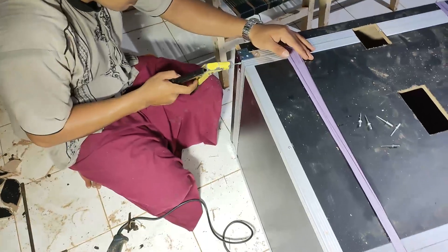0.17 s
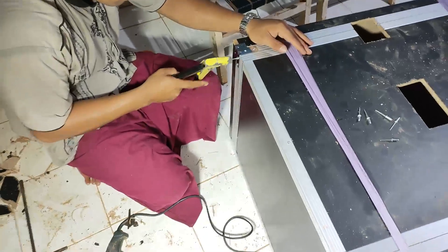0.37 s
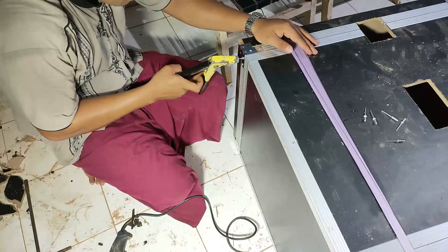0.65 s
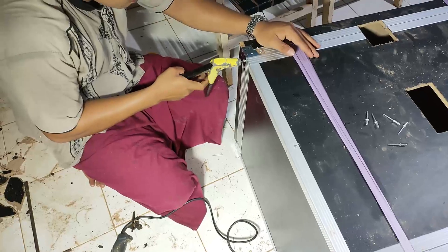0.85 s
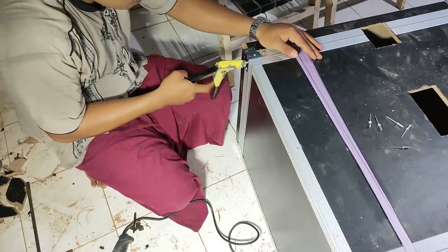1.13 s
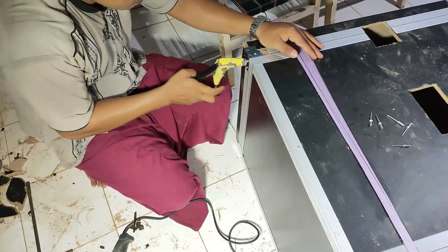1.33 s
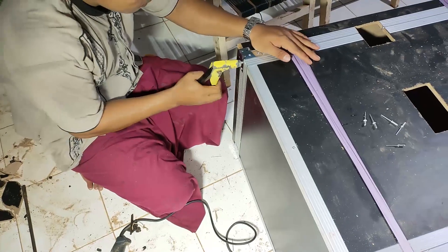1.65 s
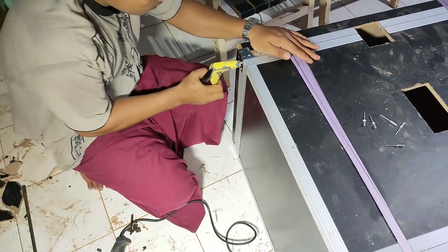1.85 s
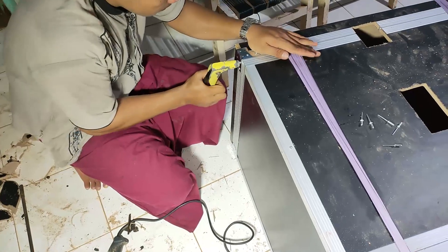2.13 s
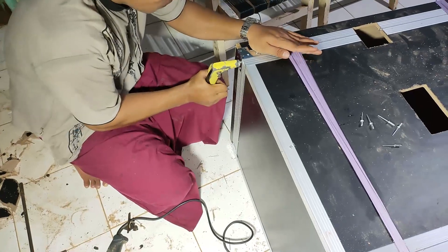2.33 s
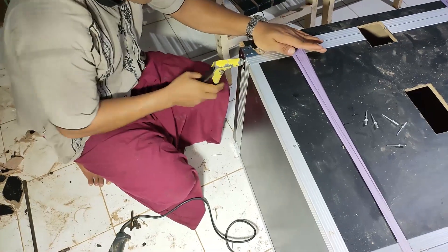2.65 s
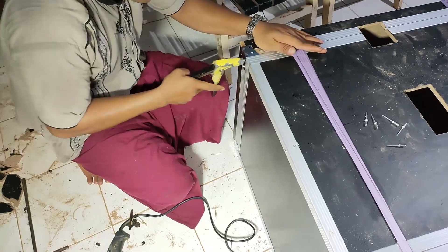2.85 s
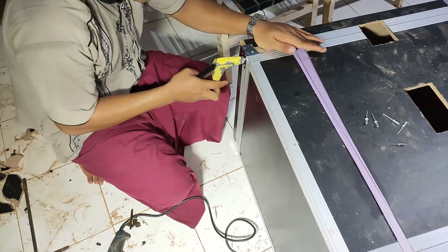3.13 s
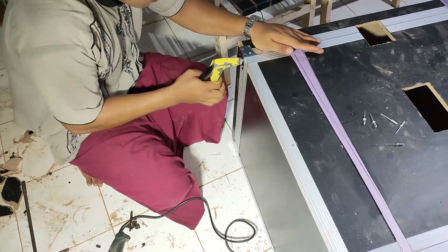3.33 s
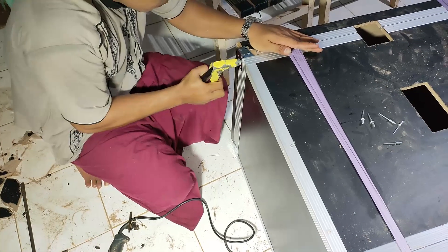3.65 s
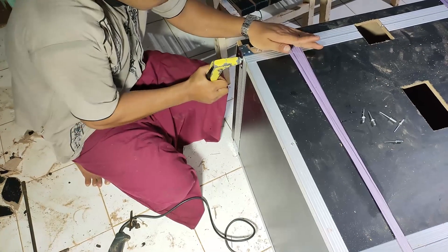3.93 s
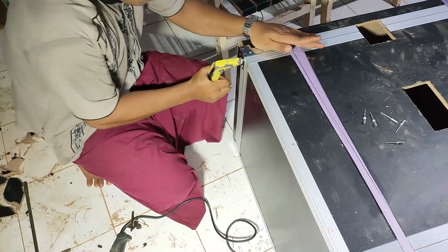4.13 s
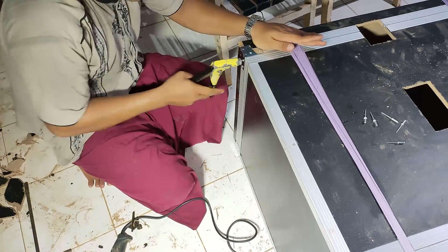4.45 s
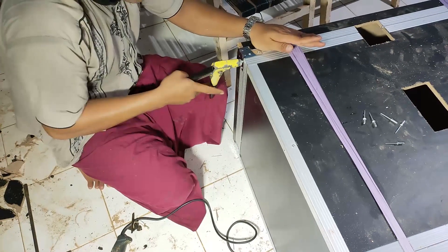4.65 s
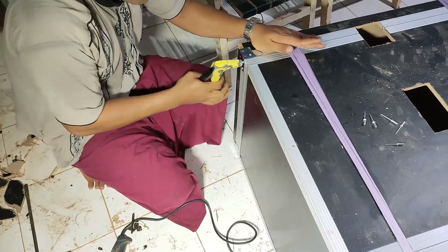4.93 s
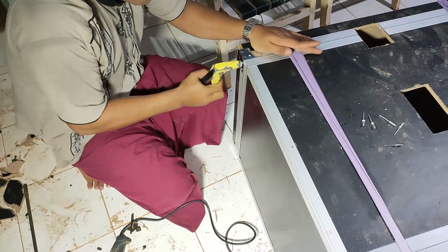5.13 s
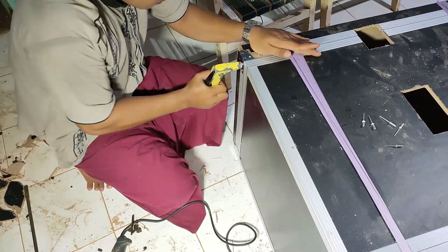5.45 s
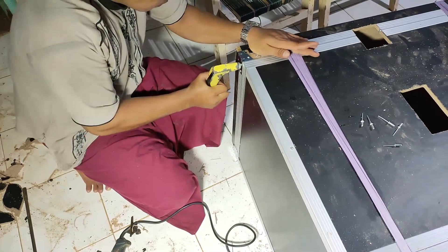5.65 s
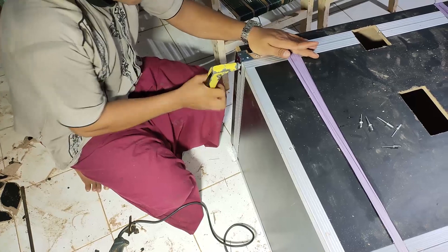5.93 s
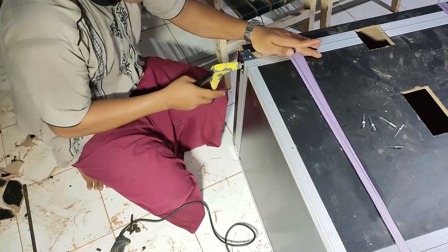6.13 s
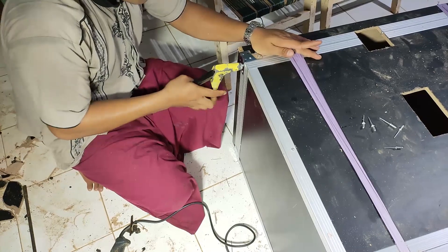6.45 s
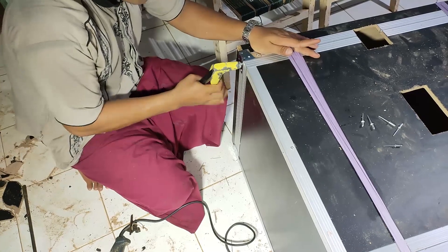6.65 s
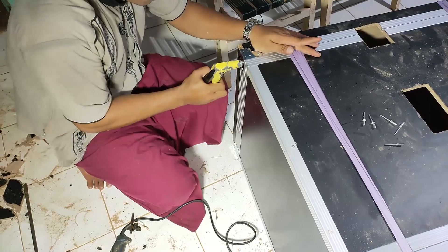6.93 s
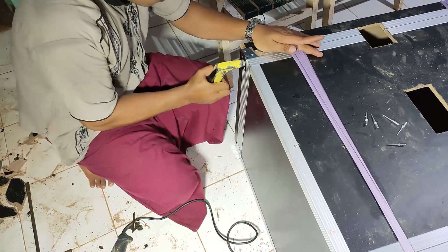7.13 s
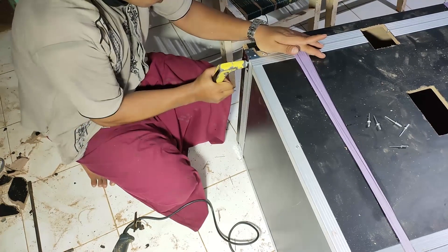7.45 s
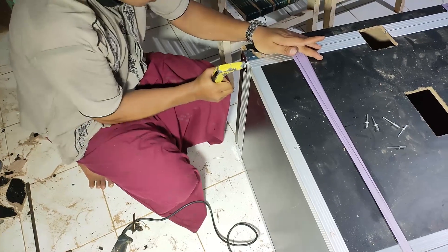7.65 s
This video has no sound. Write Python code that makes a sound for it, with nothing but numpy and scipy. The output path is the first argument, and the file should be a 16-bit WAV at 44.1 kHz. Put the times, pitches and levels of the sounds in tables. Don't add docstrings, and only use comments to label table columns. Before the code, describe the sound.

Dry, hard metal clicks of a lever tool, heard near and roughly centred, each with a short hard-walled room tail. Opening snaps give way to scattered jaw ticks, then wooden, boxy knocks against a metal profile with low creaks and brief scrapes. Two louder handle snaps leave steel ringing briefly in the later part, and the activity thins to a few small knocks. Distant insects make a thin constant hiss.

```python
import sys
import numpy as np
from scipy import signal
from scipy.io import wavfile
from scipy.ndimage import uniform_filter1d

SR = 44100
rng = np.random.default_rng(int(sys.argv[2]) if len(sys.argv) > 2 else 0)


def store_wav(level_fs):
    pcm = np.round(np.clip(np.atleast_2d(level_fs), -1, 1) * 32767)
    wavfile.write(sys.argv[1], SR, pcm.T.astype(np.int16))


def level_to_linear(level):
    exponent = np.asarray(level, float) / 20
    return 10 ** exponent


N = 343098


def evened(x):
    return x / np.sqrt(np.mean(x ** 2) + 1e-20)


def read(points, hz):
    f, value = np.transpose(points)
    return np.interp(np.log(hz + 1), np.log(f + 1), value)


def add(mix, start_s, sound):
    part = mix[round(start_s * SR):][:len(sound)]
    part += sound[:len(part)]


def ring(modes, size=16384, rise_cycles=0):
    t = np.arange(size) / SR
    out = np.zeros(size)
    for hz, db, t60_s in modes:
        build_up = 1 - np.exp(-hz * t / (rise_cycles + 1e-6))
        out += level_to_linear(db - 60 * t / t60_s) * np.sin(2 * np.pi * hz * t) * build_up
    return out


def struck(modes, luck, detune, spread_db):
    return [(hz * (1 + detune * a), db + spread_db * b, t60_s)
            for (hz, db, t60_s), a, b in zip(modes, *luck)]


def humps(start_s, length_s, db, rise_db_per_s, fall_db_per_s):
    t = np.arange(0, N + 64, 64)[:, None] / SR
    climb_db = rise_db_per_s * np.maximum(start_s - t, 0)
    sink_db = fall_db_per_s * np.maximum(t - start_s - length_s, 0)
    return np.interp(np.arange(N) / SR, t[:, 0], level_to_linear(db - climb_db - sink_db).sum(axis=1))


# (frequency [Hz], correlation [-1..1])
LIKENESS = [(60, 0.99), (180, 0.19), (550, 0.25), (1650, -0.048), (4970, 0.01), (15000, -0.031)]
# (frequency [Hz], level [dB])
LEFT_LEAN = [(60, -2), (240, 4), (950, -1.5), (3770, -5.5), (15000, -2.5)]


def hiss(colour, patchy_db, swell_db):
    frames, hz = N // 192 + 5, np.fft.rfftfreq(512, 1 / SR)
    a, b, c, d, patches = rng.standard_normal((frames, 257, 5)).T
    patches = uniform_filter1d(patches, size=5, axis=0)
    patches = evened(uniform_filter1d(patches, size=10, axis=1))
    swell = evened(uniform_filter1d(uniform_filter1d(a[0], size=40), size=40))
    same = np.clip(read(LIKENESS, hz), -1, 1)[:, None]
    left = a + 1j * b
    right = same * left + np.sqrt(1 - same ** 2) * (c + 1j * d)
    z = np.array([left, right])
    z *= level_to_linear(read(colour, hz)[:, None] + patchy_db * patches + swell_db * swell)
    z *= level_to_linear(np.multiply.outer([.5, -.5], read(LEFT_LEAN, hz)))[..., None]
    return evened(signal.istft(z, nperseg=512, noverlap=320)[1][:, :N])


# (frequency [Hz], t60 [s])
ROOM_T60 = [(100, 0.12), (260, 0.44), (700, 0.27), (1840, 0.29), (4850, 0.36), (12800, 0.2)]


def room(x):
    taps = np.zeros((2, 24000))
    at = np.arange(100, 23980, 10) + rng.integers(0, 10, (2, 2388))
    np.put_along_axis(taps, at, rng.choice([-1., 1.], at.shape), 1)
    hz, t, z = signal.stft(taps, SR, nperseg=128)
    z = z * level_to_linear(-60 * t / read(ROOM_T60, hz)[:, None])
    tail = signal.istft(z, SR, nperseg=128)[1]
    return signal.oaconvolve(x[None], tail / np.linalg.norm(tail[0]), axes=1)[:, :N]


# (frequency [Hz], density [dB per Hz])
AIR_COLOUR = [(30, 0), (55, -20.5), (300, -10.5), (467, -7), (547, -2), (860, -12), (1450, -14.5),
              (2160, -5.5), (3000, -16), (5200, -20.5), (8500, -17), (15300, -19.5), (16200, -35)]


def air():
    return level_to_linear(-55.5) * hiss(AIR_COLOUR, 2.76, 1.0)


# (frequency [Hz], density [dB per Hz])
CHORUS_COLOUR = [(3060, -32), (5200, -21), (5530, -9.5), (6450, 1), (7250, 2), (7600, -1.5), (7870, -20),
                 (8600, -68), (11200, -38), (18900, -120)]


def insects():
    return level_to_linear(-50) * hiss(CHORUS_COLOUR, 1.83, 0.53)


# (frequency [Hz], level [dB], t60 [s])
CABINET_MODES = [(53.1, -2, 0.42), (94.1, -12.5, 0.82), (128.9, 0, 0.22), (252, -40.5, 0.099),
                 (287.2, 3.5, 0.15), (376, -6.5, 0.16), (438, -2, 0.1), (510, -13, 0.14),
                 (543, -4.5, 0.092), (663, -6, 0.09)]
# (time [s], level [dB])
PUSH_WEIGHT = [(0.0, -68), (0.4, -72), (0.93, -65), (1.65, -83), (2.04, -60.5), (2.42, -58), (2.7, -60),
               (2.97, -61), (3.45, -64), (3.7, -55.5), (3.92, -72), (4.4, -66), (5.03, -53), (5.55, -63),
               (5.72, -77), (6.69, -54.5), (7.5, -69), (7.78, -59)]
# (time [s], peak [dB], swell time [s])
CABINET_JOLTS = [(0.12, -56, .1), (0.33, -42, .05), (1.9, -51, .1), (2.47, -38.5, 0.033),
                 (2.86, -28, 0.088), (2.99, -31.5, 0.018), (3.508, -22, 0.022), (4.01, -48, .04),
                 (4.239, -35, 0.01), (4.68, -32, 0.059), (4.9, -33, 0.047), (5.55, -39.5, 0.15),
                 (5.96, -41, 0.014), (6.37, -37, 0.062), (6.58, -26, 0.05), (6.85, -41, 0.045),
                 (7.24, -40.5, 0.16), (7.65, -46, 0.022)]


def creak():
    panel_db = np.interp(np.arange(N) / SR, *np.transpose(PUSH_WEIGHT))
    start_s, db, swell_s = np.transpose(CABINET_JOLTS)
    upper = level_to_linear(-58.5 + 0.54 * (panel_db + 65.5))
    upper = upper + humps(start_s, 0, db, 20 / swell_s, fall_db_per_s=158)
    out = 0
    for modes, level in ((CABINET_MODES[:3], level_to_linear(panel_db)), (CABINET_MODES[3:], upper * level_to_linear(-11))):
        slips = level_to_linear(2 * rng.exponential(1, N)) * rng.standard_normal(N)
        slips *= rng.random(N) < 600 / SR
        damped = [(hz, 0.85 * mode_db, 0.37 * t60_s) for hz, mode_db, t60_s in modes]
        out = out + evened(signal.oaconvolve(slips, ring(damped, size=8192))[:N]) * level
    return out


# (frequency [Hz], density [dB per Hz])
GRIT_COLOUR = [(500, -7), (800, -6.5), (1500, -4), (2900, -9), (4000, -10.5), (6900, 0), (12600, -7),
               (14000, -8), (16000, 2)]
# (start [s], length [s], fizz [dB], scuff re fizz [dB])
NOSE_SLIDES = [(0.0, 0.02, -48.5, 10.5), (0.15, 0.083, -46, 1.5), (1.31, .12, -51, -2),
               (1.462, 0.014, -46, -11), (1.5, .08, -52, -6), (1.605, 0.056, -45.5, -13),
               (1.716, 0.095, -50, -15), (2.8, .18, -66, 20.5), (4.626, 0.068, -63, 21.5),
               (4.824, .05, -76, 15), (6.27, 0.061, -70, 20), (6.558, 0.047, -52, 12),
               (6.796, 0.064, -60, -7), (7.13, 0.11, -61.5, 9)]
SLIDE_EDGE_DB_PER_S = 236
# (time [s], scuff [dB])
NOSE_SKIDS = [(0.108, -35), (0.33, -45), (0.38, -44), (0.95, -41), (2.448, -36), (2.812, -52), (2.982, -35),
              (4.688, -56), (4.736, -33), (6.356, -40.5), (6.419, -29.5), (6.797, -43)]


def rub():
    start_s, length_s, db, scuff_db = np.transpose(NOSE_SLIDES)
    edges = SLIDE_EDGE_DB_PER_S, SLIDE_EDGE_DB_PER_S
    fizz = humps(start_s, length_s, db + 3, *edges)
    scuff = humps(start_s, length_s, db + scuff_db - 9.5, *edges)
    start_s, db = np.transpose(NOSE_SKIDS)
    scuff = scuff + humps(start_s, 0, db - 7, rise_db_per_s=2500, fall_db_per_s=333)
    grains = level_to_linear(3.4 * np.minimum(rng.exponential(1, N // 40 + 1), 3))
    grit = hiss(GRIT_COLOUR, 5.8, 0.81) * grains.repeat(40)[:N]
    low = signal.sosfilt(signal.butter(4, 3800, "low", fs=SR, output="sos"), grit)
    high = signal.sosfilt(signal.butter(4, 3800, "high", fs=SR, output="sos"), grit)
    return fizz * evened(high) + scuff * evened(low)


# (time [s], pitch [Hz], peak [dB],
# t60 [s])
SINGLE_PINGS = [(0.977, 2190, -46.5, 0.29), (0.976, 4720, -49, 0.24), (1.693, 2750, -39, 0.037),
                (2.27, 1620, -46.5, 0.076), (0.113, 1350, -32, 0.06), (0.13, 1650, -33, 0.055),
                (3.83, 770, -55, 0.4), (4.877, 1400, -23.5, 0.036), (4.877, 1690, -24, 0.038),
                (4.877, 3200, -16.5, 0.029), (6.566, 1500, -22, .04), (6.566, 780, -28, .05),
                (2.17, 130, -44, 0.38), (5.38, 127, -41, 0.3), (2.96, 128, -39.5, 0.48),
                (7.15, 1850, -47, 0.044), (7.188, 1840, -47.5, .05), (7.222, 1800, -51, 0.045),
                (7.257, 2200, -49, .05)]


def pings():
    out = np.zeros(N)
    for start_s, hz, db, t60_s in SINGLE_PINGS:
        add(out, start_s, ring([(hz, db, t60_s)], rise_cycles=2.6))
    return out


# (frequency [Hz], level [dB], t60 [s])
PIN_MODES = [(5850, 0, 0.25), (15520, -3, 0.11)]
# (time [s], peak [dB], low mode relative [dB])
TAPS_ON_PIN = [
    (0.127, -35, -24),
    (0.4325, -30.5, -16),
    (0.662, -33, -23),
    (0.8025, -39, -22),
]


def pin():
    out, (low, top) = np.zeros(N), PIN_MODES
    for start_s, peak_db, low_db in TAPS_ON_PIN:
        modes = [(low[0], low_db + 1, low[2]), (top[0], -4, top[2]), (top[0] + 110, -14, .1)]
        add(out, start_s, level_to_linear(peak_db) * ring(modes))
    return out


# (frequency [Hz], level [dB], t60 [s])
LEVER_MODES = [(1380, 4, 0.28), (1784, 8, 0.14), (2440, -4, 0.16), (3080, -4, 0.091), (2975, -25, 0.13),
               (3000, -10, 0.14), (2940, -26, 0.063), (3310, 24, 0.09), (3970, -14, .2), (4900, 2, .13),
               (5760, -6, .12), (7300, -10, .12), (8550, -20, .12), (8705, -16, .12)]
# (time [s], level [dB])
LEVER_BLOWS = [
    (0.1105, -36.5),
    (0.3303, -50),
    (2.9828, -53),
    (4.8756, -25),
    (6.564, -35),
]


def lever():
    out, luck = np.zeros(N), rng.standard_normal((len(LEVER_BLOWS), 2, len(LEVER_MODES)))
    for (start_s, db), chance in zip(LEVER_BLOWS, luck):
        sound = ring(struck(LEVER_MODES, chance, .004, 2), rise_cycles=2.8)
        add(out, start_s, level_to_linear(db) * sound / abs(sound).max())
    return out


# (time [s], blow peak [dB], jaw re blow [dB], tail [dB])
HANDLE_SNAPS = [
    (0.1103, -11, -27.5, -1.5),
    (0.3305, -13, -15.5, 3),
    (0.9645, -30.5, -11, 4.5),
    (1.279, -37, -31, -5),
    (1.6282, -31.5, -31, 3),
    (1.6903, -20.5, -18, -4.5),
    (4.8766, -6.5, -20.5, -1.5),
    (6.3604, -28, -38, -10),
    (6.566, -1.5, -22.5, -3),
    (7.393, -28.5, -16.5, 2),
]
# (time [s], blow peak [dB], jaw re blow [dB], tail [dB])
JAW_TICKS = [(0.4266, -32, -18, 5.5), (0.4326, -36, -3, -13), (0.6611, -39, -3, -0.5),
             (0.669, -56, -2, -4.5), (0.8014, -49, 1, -5), (1.1323, -49, -5.5, 5.5),
             (1.4363, -40.5, -1, -6), (1.462, -36, -8.5, 2.5), (1.5883, -31.5, -8, -5),
             (1.703, -39, -4, -4), (1.9223, -41, -7.5, 1.5), (1.9756, -33.5, -15.5, -15),
             (2.655, -48.5, 3.5, -20), (2.8472, -41, -1.5, -20), (3.1876, -50.5, 6, -22),
             (3.3755, -29, -13, 2.5), (4.6458, -36.5, 4, -0.5), (5.1476, -35.5, -6.5, 1.5),
             (5.8553, -35, -6.5, 0), (5.915, -41, -3, 1), (6.485, -46.5, 4.5, -3)]
# (time [s], blow peak [dB], cabinet re blow [dB], profile re blow [dB])
NOSE_KNOCKS = [(0.227, -44, -1, -11), (0.377, -22.5, -39, -4), (1.8693, -30.5, -12.5, -17),
               (2.7962, -19.5, -11.5, -7.5), (2.921, -28.5, -12, -23), (2.9826, -9.5, -27.5, -14.5),
               (3.4987, -16.5, -1, -7.5), (4.241, -17, -22.5, -13.5), (4.736, -21, -15, -11),
               (4.8518, -29.5, -22, -16), (6.3116, -29, -21, -7), (6.4213, -21, -10.5, -10.5),
               (7.636, -25, -18, -9)]
# (time [s], blow peak [dB], cabinet re blow [dB], profile re blow [dB])
JAW_CLACKS = [
    (2.4489, -25, -8, -9.5),
    (2.7275, -26.5, -20, -13.5),
    (2.8134, -49, -14, 3),
    (4.6827, -38, -21, 7.5),
    (4.8588, -25.5, -15, -18),
    (5.9526, -19.5, -20, -13.5),
    (6.7883, -31.5, -26, -13.5),
    (6.8492, -35, -5, -17),
]


def all_clicks():
    rows = [(s, db, -31, -40.5, jaw_db, tail_db) for s, db, jaw_db, tail_db in HANDLE_SNAPS]
    rows += [(s, db, -26, -25, jaw_db, tail_db) for s, db, jaw_db, tail_db in JAW_TICKS]
    rows += [(*row, -30.5, -1.5) for row in NOSE_KNOCKS]
    rows += [(*row, -20, 0.7) for row in JAW_CLACKS]
    return sorted(rows)


# (frequency [Hz], level [dB], t60 [s])
PROFILE_MODES = [(700, -51, 0.054), (980, -40, 0.03), (1316, -5, 0.064), (1440, -5, 0.03),
                 (1690, 8.5, 0.016), (1886, -1.5, 0.022), (2314, 9, 0.014)]
HANDLE_MODES = [(3126, 5, 0.012), (3456, 6.5, 0.011), (4070, 5, 0.011), (4700, 12, 0.0062),
                (5470, 1.5, 0.043), (6520, 8, 0.0088), (6810, 15.5, 0.0043), (7730, 14, 0.0082)]
JAW_MODES = [(8500, 17, 0.0023), (9480, 4.5, 0.012), (9970, 2, 0.0093), (10770, 11.5, 0.0038),
             (12040, 2, 0.026), (14550, 8, 0.011), (14100, -23, .004), (15100, 1, 0.007)]


def clicks():
    rows = all_clicks()
    shape = (len(rows), 600)
    size = level_to_linear(4.23 * rng.exponential(1, shape)) * rng.choice([-1., 1.], shape)
    size *= rng.random(shape) < .15
    luck = rng.standard_normal((len(rows), 4, 2, 10))
    cabinet, tool, tails = np.zeros(N), np.zeros(N), np.zeros((2, N))
    for row, (start_s, peak_db, box_db, profile_db, jaw_db, tail_db) in enumerate(rows):
        rattle_ms = 1.2 + 4.5 * level_to_linear(0.54 * peak_db)
        u = np.arange(600) / SR * 1000 / rattle_ms
        rattle = size[row] * np.sqrt(u) * np.exp(-u ** 4)
        rattle[round(.6 * rattle_ms * SR / 1000)] = 1.44 * abs(rattle).max() + 1e-6
        boom = ring(struck(CABINET_MODES, luck[row, 0], 0.026, 1.13), size=9000, rise_cycles=0.95)
        add(cabinet, start_s, level_to_linear(peak_db + box_db) * boom / abs(boom).max())
        parts = (PROFILE_MODES, profile_db + 2), (HANDLE_MODES, -3), (JAW_MODES, jaw_db + 16.5)
        for (part, db), chance in zip(parts, luck[row, 1:]):
            modes = struck(part, chance, .012, 1.5)
            sound = np.convolve(rattle, ring(modes, size=900))
            sound *= level_to_linear(peak_db + db) / abs(sound).max()
            spray = ring([(hz, mode_db, .3 * t60_s) for hz, mode_db, t60_s in modes], size=300)
            spray *= np.linalg.norm(sound) / np.linalg.norm(spray)
            add(tool, start_s - .0015, sound)
            add(tails[row % 2], start_s, level_to_linear(tail_db) * spray)
    return cabinet, tool, tails


def scene():
    cabinet, tool, tails = clicks()
    steel, tool = pin(), tool + pings() + lever()
    left = tool * level_to_linear(-0.5) + steel * level_to_linear(-19)
    right = np.roll(tool, -1) * level_to_linear(3) + steel * level_to_linear(10)
    wet = sum(room(tail) for tail in tails) * level_to_linear(np.array([[-.8], [.8]]))
    box = cabinet + creak()
    boom = box + level_to_linear(-16) * room(box + level_to_linear(16) * steel)
    return np.array([left, right]) + wet + boom + rub() + insects() + air()


def top_cut(x):
    return signal.sosfilt(signal.butter(12, 16820, fs=SR, output="sos"), x)


def record(dry):
    heard = signal.sosfilt(signal.butter(3, 40, "high", fs=SR, output="sos"), dry)
    edge = signal.firwin2(255, [0, 15700, 16100, 16900, SR / 2], [1, 1, .06, .03, 0], fs=SR)
    heard = signal.oaconvolve(heard, edge[None], "same", axes=1)
    ceiling, offset = .8, .00577
    mix = ceiling * np.tanh(heard / ceiling) + offset
    return top_cut(mix)


dry = scene()
out = record(dry)
store_wav(out)
```